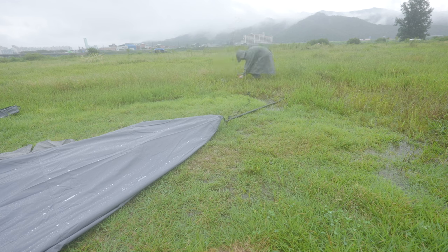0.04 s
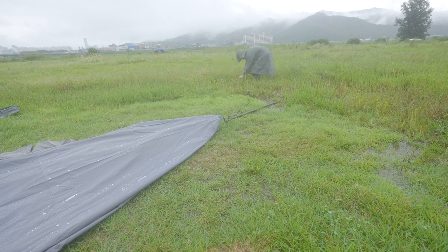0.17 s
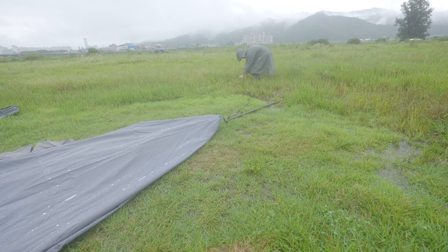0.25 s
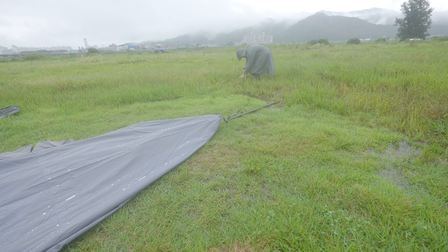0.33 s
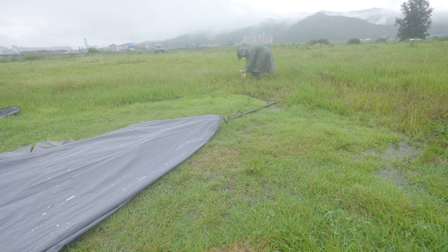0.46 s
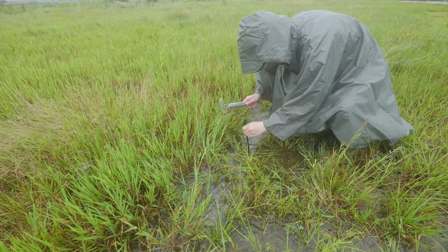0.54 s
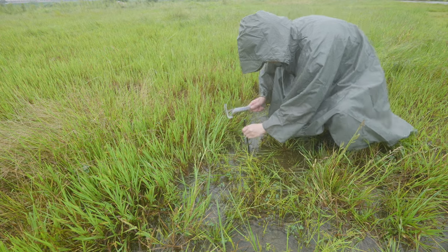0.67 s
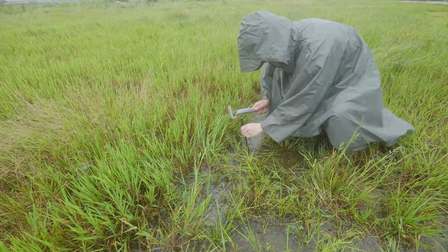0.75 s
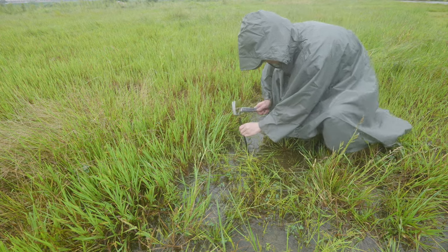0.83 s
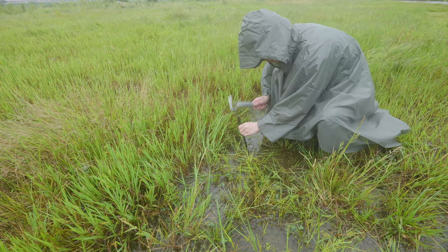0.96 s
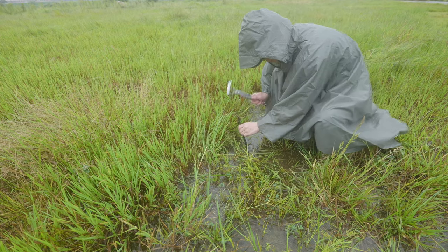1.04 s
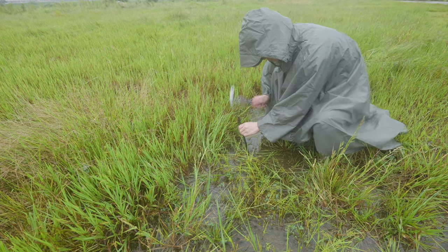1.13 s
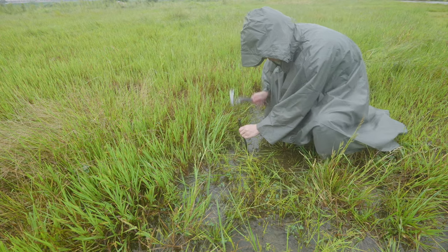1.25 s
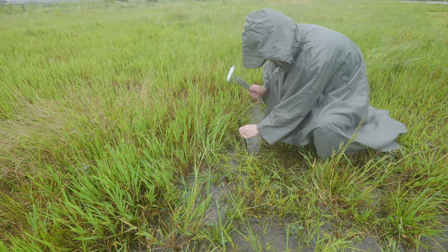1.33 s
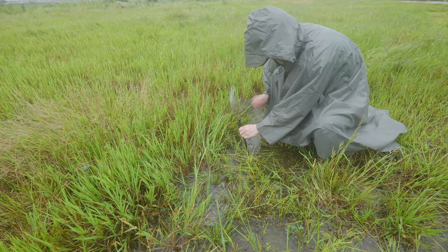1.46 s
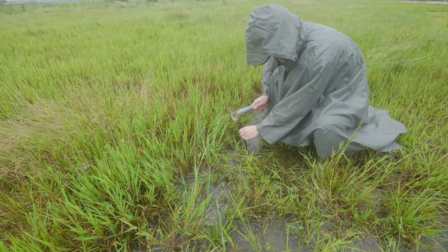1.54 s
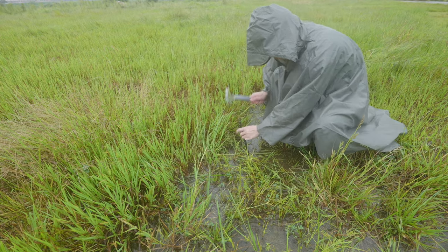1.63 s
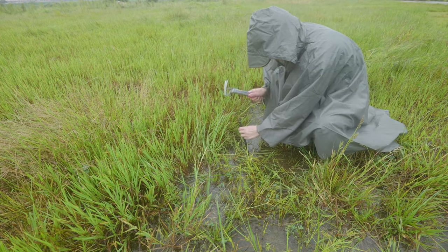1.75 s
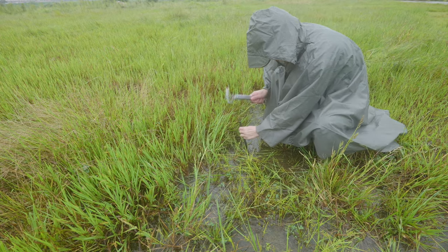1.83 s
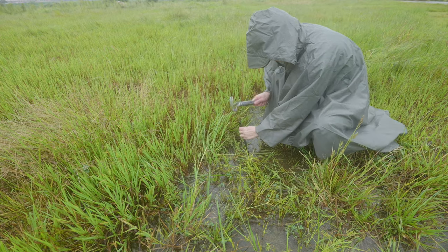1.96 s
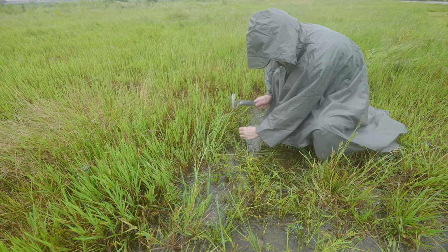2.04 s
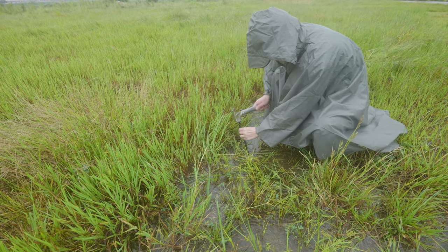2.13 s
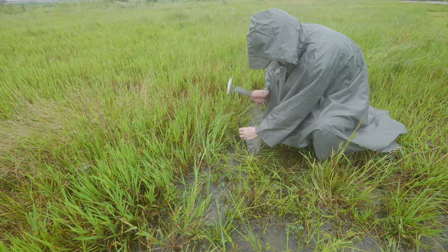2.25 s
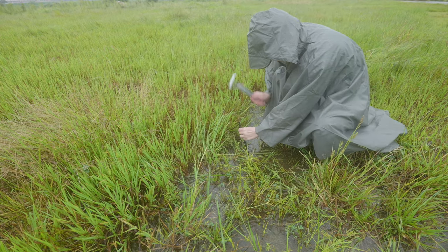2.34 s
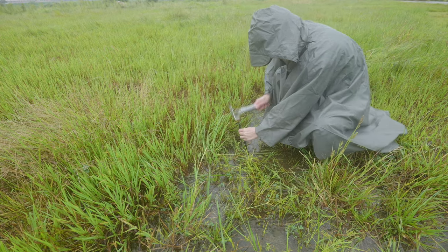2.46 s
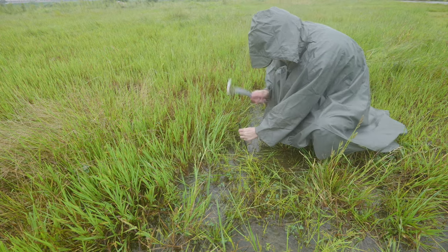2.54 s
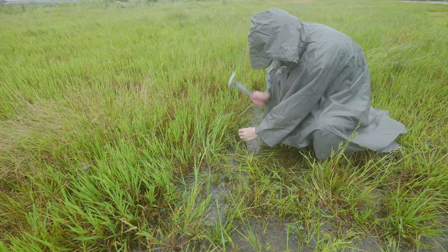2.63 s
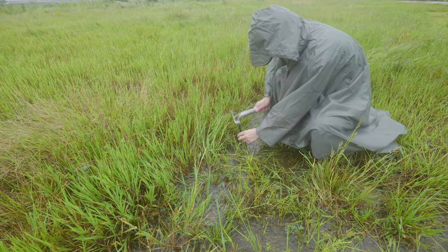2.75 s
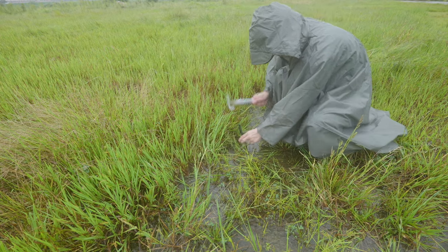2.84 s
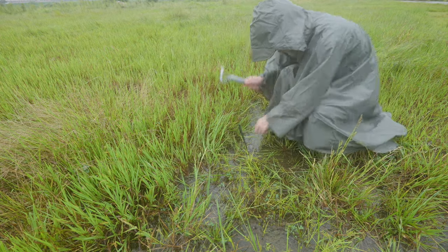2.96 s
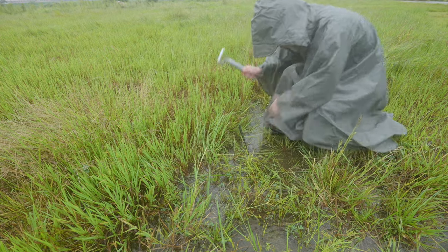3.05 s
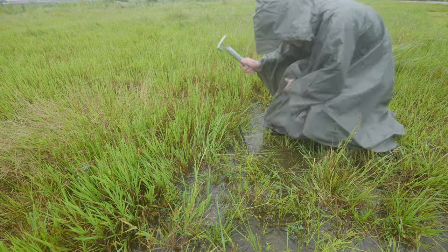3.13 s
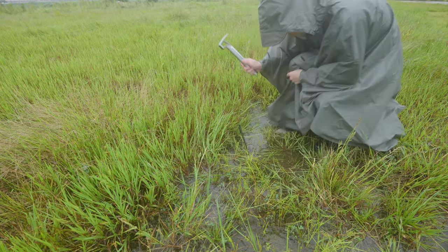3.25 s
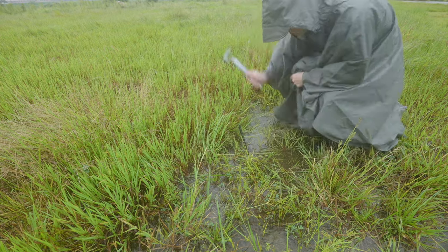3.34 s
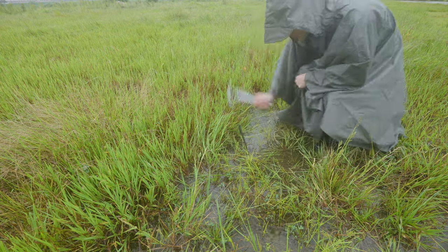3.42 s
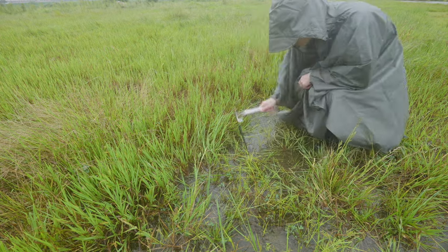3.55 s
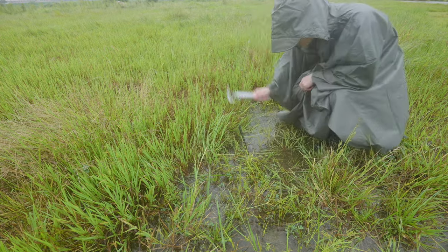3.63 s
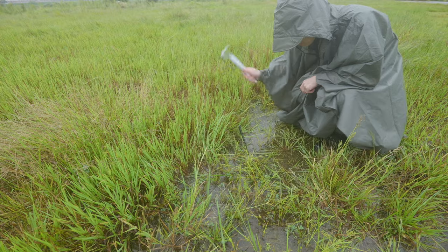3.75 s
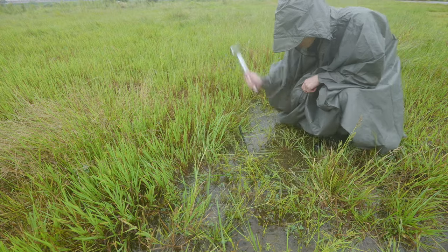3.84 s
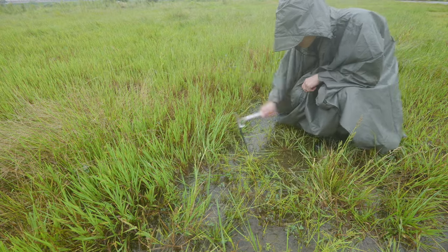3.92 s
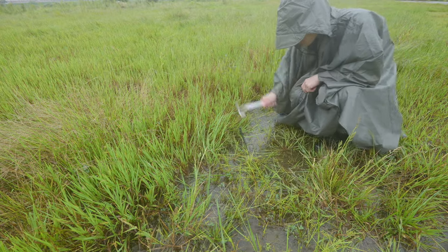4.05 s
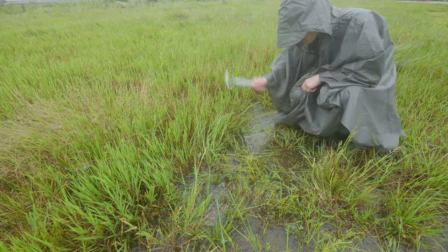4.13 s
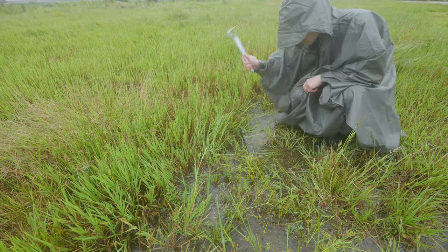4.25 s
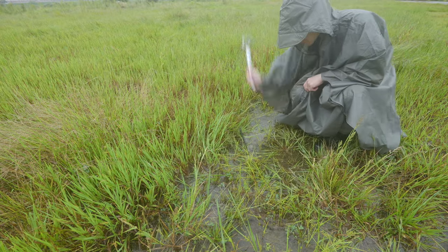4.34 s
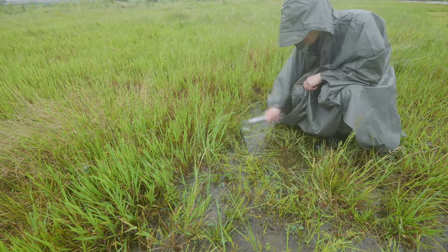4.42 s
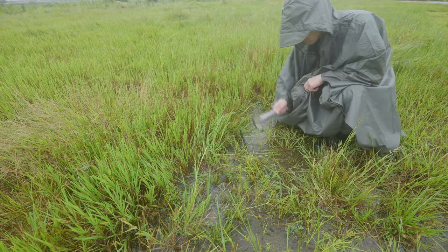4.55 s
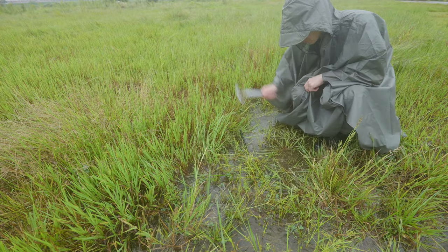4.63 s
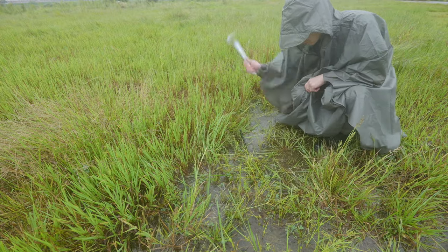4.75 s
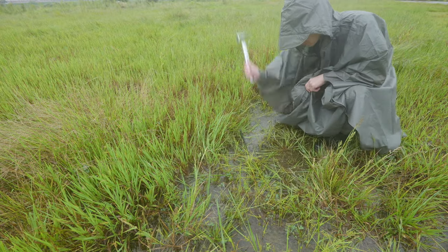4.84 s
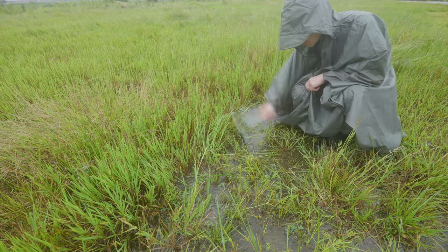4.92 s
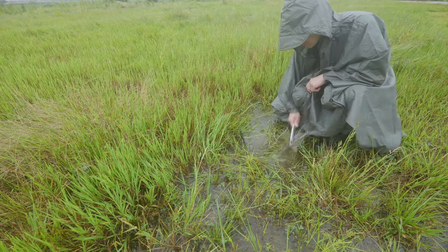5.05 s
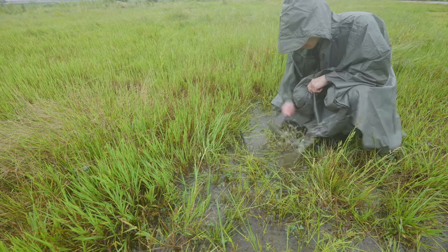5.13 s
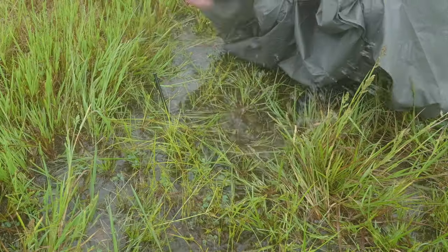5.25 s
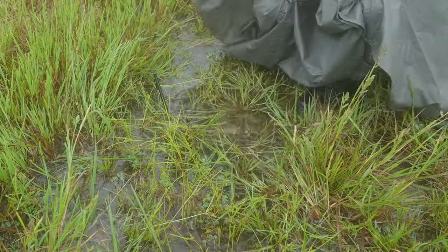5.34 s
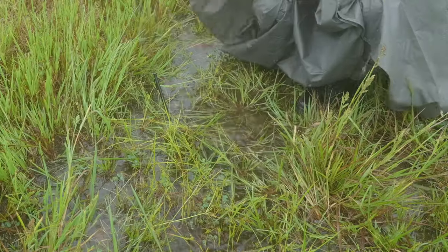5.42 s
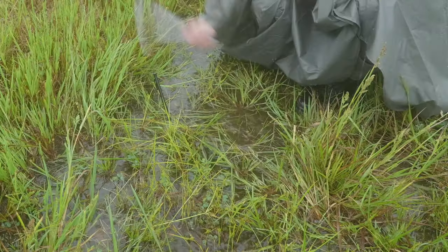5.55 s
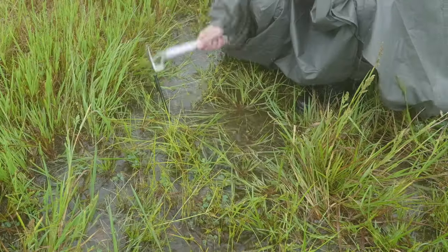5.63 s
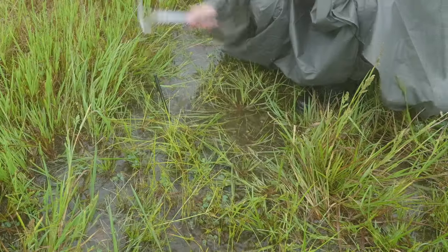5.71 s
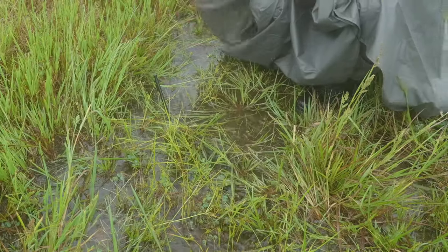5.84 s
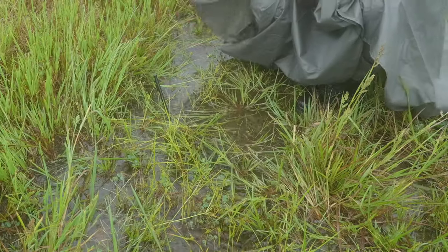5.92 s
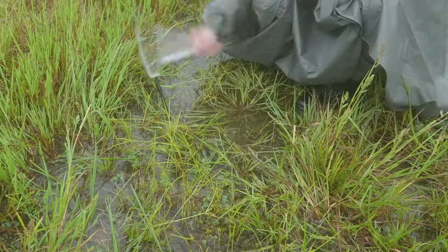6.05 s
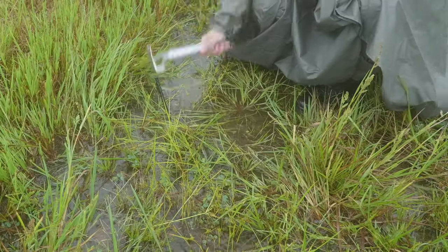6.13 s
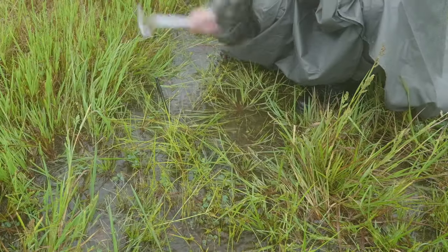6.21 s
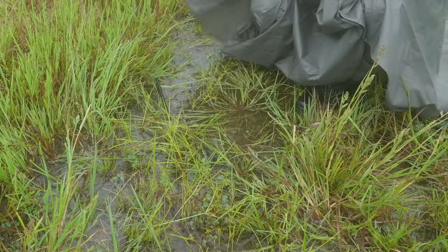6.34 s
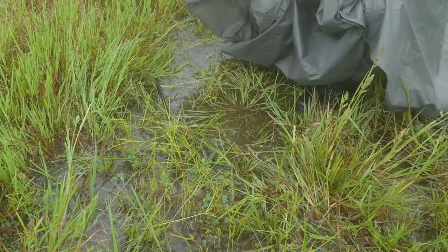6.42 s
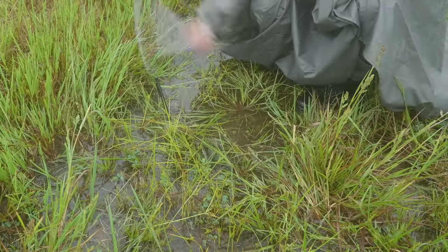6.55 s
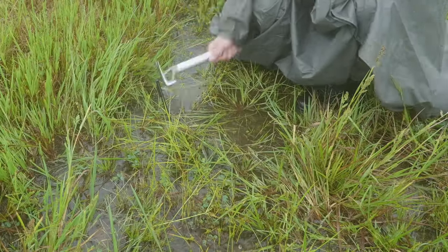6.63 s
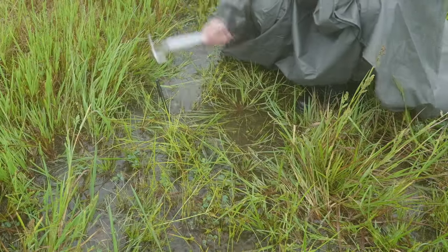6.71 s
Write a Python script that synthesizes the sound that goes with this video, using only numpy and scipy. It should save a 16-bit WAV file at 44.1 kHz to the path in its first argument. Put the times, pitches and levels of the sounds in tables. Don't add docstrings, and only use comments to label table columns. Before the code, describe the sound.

A steel hammer drives a peg into waterlogged turf with sharp, bright ringing cracks, over soft rain and fat drops ticking on a cloth cover.

```python
import sys
import numpy as np
from scipy import signal
from scipy.fft import rfft, irfft
from scipy.io import wavfile
from scipy.ndimage import uniform_filter1d

SR = 44100
rng = np.random.default_rng(int(sys.argv[2]) if len(sys.argv) > 2 else 0)


def makeup_ratio(level_db):
    decades = np.asarray(level_db, float) / 20
    return 10 ** decades


def master_out(mix):
    frames = np.transpose(np.atleast_2d(mix))
    ceiling = np.clip(frames, -1, 1)
    pcm = np.round(ceiling * 32767).astype(np.int16)
    wavfile.write(sys.argv[1], SR, pcm)


N = 298998

# [t/s, gust level/dB, rain level/dB]
WEATHER = [(0, -52, -39), (.3, -37, -37.5), (.49, -40, -38), (.68, -49.5, -46), (1.101, -38.5, -45.5),
           (1.3, -48, -50), (1.701, -54, -53.5), (2.06, -52, -52), (2.38, -48, -45.5), (2.81, -50, -55.5),
           (3.079, -52.5, -52), (3.25, -45, -49.5), (3.499, -49, -52.5), (3.901, -52.5, -53.5),
           (4.7, -57.5, -53.5), (5.5, -49.5, -54.5), (6.101, -51, -54.5), (6.78, -50.5, -54.5)]
# [f/Hz, density/dB per Hz]
WIND_SPECTRUM = [(25, 7), (55, 3.5), (110, 1.5), (250, -2.5), (500, -40.5)]
# [f/Hz, density/dB per Hz]
PATTER_SPECTRUM = [(100, -4.5), (250, -1.5), (600, 2), (1200, 2), (2500, -9), (5000, -57)]
# [f/Hz, density/dB per Hz]
HISS_SPECTRUM = [(800, -3.5), (2000, 4), (4000, 0.5), (7000, -4.5), (8200, -5.5), (12000, -7), (15600, -13),
                 (16200, -32)]
# [f/Hz, density/dB per Hz]
RUMBLE_SPECTRUM = [(30, -22), (52, 0), (70, -6), (120, -24), (300, -90)]
# [t/s, level/dB, length/s]
SHIFTS = [
    (.75, 4.7, 0.49),
    (3.3, 10.5, 0.2),
    (5.25, 3.5, 0.24),
]
# [t/s, level/dB, brightest f/Hz]
SPRAY = [(0.0054, -32, 5000), (0.0324, -37, 6000), (0.0563, -44, 5560), (0.2464, -48, 5770),
         (0.2724, -42, 5000), (0.2848, -41, 10200), (0.3067, -40, 5000), (0.3262, -37, 5710),
         (0.3656, -43, 5520), (0.3774, -44, 5200), (0.396, -34, 13000), (0.4329, -32, 7820),
         (0.4454, -37, 5460), (0.4522, -26, 7800), (0.4938, -48, 5350), (0.7048, -30.5, 5600),
         (0.8805, -31, 13200), (0.9218, -36, 5120), (1.1454, -42.5, 5530), (1.479, -30.5, 7710),
         (0.9513, -34, 4500), (2.167, -44, 5000), (2.255, -39, 6000), (2.365, -30, 5240),
         (2.385, -43, 5500), (2.533, -45, 4000), (1.315, -40, 6000), (1.367, -39, 7500), (1.377, -39, 5500),
         (1.395, -46, 6500), (3.39, -45, 5000), (3.415, -43, 9500), (3.52, -52, 13000), (3.597, -41, 6000),
         (4.48, -40.5, 6500), (4.727, -45, 8560), (5.179, -41, 6500), (3.249, -38, 5310),
         (4.4205, -43, 11000), (4.9092, -48, 5680), (5.3014, -45.5, 6290), (5.3194, -42, 6110),
         (5.3345, -35, 5700), (5.3494, -44, 5250), (5.3727, -45, 5080), (5.3961, -50, 6390),
         (5.4201, -45, 10400), (5.4494, -59, 5460), (5.5067, -34, 10200), (6.0492, -44, 6060),
         (6.5052, -45.5, 5280)]

# [t/s, thud level/dB, off centre/-1..1, tilt/-1..1, glance/-1..1]
BLOWS = [(0.101, -11.5, 0.54, -0.34, 0.57), (1.232, -21.5, -0.45, 0.3, 0.33),
         (1.556, -36, -0.58, 0.0071, -1.05), (2.179, -15.5, 0.27, 1, 0.38), (2.4727, -9, 1, -0.7, -0.12),
         (2.767, -12, 0.27, 0.24, 0.22), (3.5387, -14.5, -0.81, 0.52, 0.72),
         (3.9949, -10, -0.31, -0.13, 0.34), (4.4898, -11.5, 0.67, -0.005, -1.24),
         (5.0087, -10, -0.65, 0.48, -1.58), (5.653, -11, 1, -0.28, -0.84),
         (6.138, -12, -0.45, -0.94, 0.067), (6.6484, -11.5, -1.1, -0.47, 0.32)]
# [f/Hz, t60/s]
PEG = [(2190, .04), (2670, .018), (3607, .022), (6120, .018)]
# [f/Hz, t60/s]
HEAD = [(7025, .062), (8085, .034), (10735, .058), (13170, .03)]
# [f/Hz, t60/s]
CLAW = [(1150, .012), (4300, .02), (4850, .016), (9650, .033)]
# [square level/dB, off centre/dB, tilt/dB, glance/dB]
STIR = [(-18, 5.5, 1.5, -3.5), (-16.5, -4, -2, -7), (-16, -2, 10.5, -3.5), (-7, 0.4, -0.5, 2),
        (-21, -10.5, 4, 2), (-12, 4.5, 6.5, -1), (-15.5, -7, -6, -4), (-7.5, -1, -1, 1),
        (-26.5, -3.5, -4.5, -6), (-28.5, -1, 4, 3.5), (-28, -10, 4, 0), (-23.5, 8, 0.7, 7.5)]
# [f/Hz, level/dB, t60/s]
MINOR = [(3100, -23.5, 0.029), (7780, -19, 0.051), (7600, -45, 0.05), (11400, -16, 0.03), (13260, -9, 0.01),
         (14400, -29, 0.034), (10900, -25, 0.047)]
# [f/Hz, density/dB per Hz]
CRACK_SPECTRUM = [(180, -59.5), (300, -11.5), (5160, -2.5), (8390, 5.5), (9270, -6), (12100, -3),
                  (15800, -17), (16600, -28.5)]
# [f/Hz, density/dB per Hz]
EDGE_SPECTRUM = [(12000, -41), (14000, 2.5), (15500, -2), (16400, -11.5), (17000, -39.5)]
# [crack level/dB, edge level/dB, scatter level/dB, peg ring/share, head ring/share]
CONTACT = [(-10, -5.5, -28, 1, 1.35), (-5, 2.5, -28, 0.91, 1.2), (-6, -12, -34, 0.89, 0.84),
           (-11, -4, -30, 1.1, 0.52), (-4.5, 2, -31.5, 0.76, .9), (-6.5, 6.5, -28.5, 1.1, 0.69),
           (-8.5, 1, -33, 0.76, 0.74), (-3.5, 0.5, -31, 0.71, 0.42), (-2, 8.5, -28, 0.93, 0.93),
           (-6, 1, -27, 0.65, 0.45), (-7, 0.5, -30, 1.24, 0.57), (-5.5, 1.5, -19, 0.95, 0.97),
           (-6, 9, -23, 0.81, 0.51)]
# [low, middle, high peg mode/dB, lowest head mode/dB]
FREEDOM = [(-3.5, 5, -13, 4), (0, 2, 1, -0.5), (-1.5, 5, 5.5, -2.5), (0.2, 0.5, -1.5, 3.5),
           (1, -0.5, 5.5, -2), (2, 4.5, 3, 2.5), (6.5, -7, 6.5, 1), (0.5, 1.5, 0.5, -1), (-2, 3.5, 4.5, 13),
           (-0.5, 0.5, 1, 0.5), (2.5, -5.5, -1, 1), (-14, -2.5, -6.5, 4.5), (3, -1, -3.5, 1.2)]
# [second peg mode/dB, three upper head modes/dB, third claw mode/dB]
GRIP = [(3, -6, 2, -8, 6), (2, 2, 0.5, 1, 1.5), (-0.5, -2, -1, -8.5, -2.5), (1.5, -2, -3, -2, 1),
        (2, -0.5, 0.5, -2.5, 2), (1, -1.5, 6, -2, 1.5), (0.5, -2.5, -2, -3, -4), (0, -8, 4.5, 4.5, 1),
        (3.5, -3.5, -5.5, -1, -8), (1.5, -19, -0.5, -3, -1), (-6, -1, -0.5, -5.5, -7),
        (2.5, -6, -2, -2, 3.5), (1.5, 2, -1, 1.5, 8)]
# [level/dB, t60/s]
HOLLOW = [(-4.5, .01), (8.5, 0.0097), (6, 0.0081), (0.2, .012), (-3, 0.012), (-2, 0.0085), (-1.5, 0.0066),
          (0.5, 0.0064), (9.5, 0.012), (-11, 0.0077), (7.5, 0.015), (-6, 0.012), (0, 0.019)]
SINGING = [1.2, 1.5, .75, 0.45, .7, 1.1, 1.1, 1.05, 0.72, 1.1, 1.1, 1.03, 0.95]
# [level/dB, t60/s, beat f/Hz, twin share/0..1, first hush/s]
WHISTLES = [(-29.5, 0.245, 14, .85, 0.071), (-24.5, 0.4, 9.1, 0.4, 0.0022), (-23, 0.31, 13.1, .55, 0.035),
            (-30.5, .27, 41.5, .16, 0.019), (-18.5, .24, 23.8, .18, .001), (-37, 0.64, 17.8, 0.36, .008),
            (-30, .29, 17.7, .26, 0.015), (-28.5, 0.46, 10.8, .41, 0.0033), (-23, .27, 39, .6, 0.033),
            (-27, .3, 110, 0.9, 0.0017), (-28, 0.22, 31, 0.6, .009), (-16, 0.26, 12.6, 0.6, 0.022),
            (-19.5, 0.25, 21, 0.4, .037)]
# [t/s, level/dB, most stirred f/Hz, t60/s]
CHATTER = [(0.1104, -4.5, 3850, 0.017), (1.244, -10.5, 6200, 0.012), (1.2484, -17, 8000, .02),
           (1.565, -6, 6300, 0.017), (2.183, -6, 3570, 0.021), (2.475, -16.5, 6160, 0.018),
           (2.772, -17.5, 3100, 0.017), (3.541, -7, 5640, 0.011), (4.496, -16.5, 3570, 0.017),
           (5.0118, -19.5, 3950, 0.029), (5.672, -23, 3540, 0.023), (6.142, -22, 6510, 0.017),
           (6.6535, -16.5, 4860, 0.007)]

# [t/s, level/dB, f/Hz, t60/s]
BUBBLES = [(.776, -37, 2500, .03), (5.224, -52, 5250, .04), (5.233, -48, 5400, .05),
           (5.45, -34, 700, 0.023), (4.497, -37, 350, 0.18), (5.66, -37, 350, 0.17), (6.166, -37, 520, .03),
           (.111, -29, 3900, .05), (.113, -32, 4350, .05), (5.088, -30, 520, .04), (5.088, -38, 2100, .03)]
# [t/s, level/dB, t60/s]
SQUIRTS = [(5.056, -41, 0.045), (5.0745, -41, .02), (4.997, -42, .014), (5.086, -38, 0.16),
           (5.126, -41, 0.12), (5.145, -44, .15), (3.444, -41, .08), (.112, -34, .08), (4.447, -50, .08),
           (3.435, -42, .07), (1.476, -38, 0.02), (4.479, -45, .015)]
# [f/Hz, density/dB per Hz]
SQUIRT_SPECTRUM = [(200, -16), (600, 4.5), (2300, -5), (6000, -9), (10000, -16), (16000, -30.5)]
# [t/s, tick level/dB, thump level/dB, thump f/Hz, splash over tick/dB]
THUMPS = [(0.257, -18, -27, 144, -26), (0.4, -37, -24, 660, -23), (0.41, -18, -42, 467, -23),
          (0.4324, -8, -13.5, 260, -26), (0.451, -1.5, -3, 427, -25), (0.639, -32, -29.5, 259, -19),
          (0.657, -25.5, -35, 190, -12), (0.986, -20.5, -30, 146, -10), (1.197, -14.5, -30, 465, -15.5),
          (1.341, -15.5, -13.5, 263.5, -17.5), (1.69, -24.5, -35, 287, -28), (1.977, -28.5, -28, 176, -27),
          (2.364, -13.5, -25, 268, -24), (2.65, -19, -29.5, 152, -27), (2.703, -19.5, -18, 232, -23.5),
          (2.991, -17, -22.5, 280, -25), (3.184, -29.5, -35, 149.7, -30), (3.913, -23.5, -20, 338, -17.5),
          (4.3606, -31, -19, 560, -19.5), (4.564, -23.5, -34, 238, -9), (4.755, -37, -35, 153, -19),
          (4.797, -31, -28.5, 177, -23), (4.963, -34, -29, 186, -23), (5.087, -22, -24, 510, -12),
          (5.373, -33.5, -39, 198, -21), (5.612, -24.5, -26.5, 359, -35), (6.127, -17, -15.5, 172, -15.5)]
# [t/s, tick level/dB, tick
# f/Hz, splash over tick/dB]
TICKS = [(0.175, -17, 885, -23), (0.274, -17, 990, -24), (0.489, -15, 1070, -34), (0.705, -30, 1150, -8.5),
         (0.717, -27.5, 900, -24), (0.808, -36, 800, -30), (0.845, -26.5, 1400, -18),
         (0.921, -24.5, 1410, -18), (1.108, -21, 960, -20), (1.504, -38.5, 1580, -5),
         (2.018, -40, 1850, -7), (2.91, -24.5, 1425, -25.5), (3.06, -24.5, 753, -21),
         (3.117, -34, 1860, -10), (3.725, -37.5, 830, -7), (3.958, -23.5, 1040, -15),
         (4.278, -35, 1570, -4.5), (4.304, -39, 1080, -4), (4.729, -42, 890, -6), (5.178, -40.5, 1640, -7),
         (1.323, -35, 1500, -8), (3.597, -31, 1500, -21), (.141, -17, 1100, -23), (.562, -33, 1500, -8),
         (5.409, -32, 1160, -14), (5.785, -35, 1000, -26), (5.912, -25, 1320, -36),
         (6.585, -35, 860, -10.5), (0.4512, 3.5, 2800, -20), (4.3597, -3, 720, -20),
         (4.3612, -7, 3200, -18), (4.3597, -10, 3700, -21), (0.4326, -5, 2460, -29)]
# [f/Hz, density/dB per Hz]
SPLASH_SPECTRUM = [(1200, -0.5), (3000, 5), (5500, -8), (9000, -30.5), (16000, -32.5)]
# [t/s, level/dB, f/Hz]
FLAPS = [(0.153, -24, 104), (0.245, -16, 135), (0.432, -18, 69), (0.997, -22.5, 94), (1.34, -17.5, 93),
         (1.978, -31, 103.7), (2.326, -36, 85.5), (2.657, -27, 145), (2.98, -32, 88.3), (3.496, -27.5, 101),
         (4.484, -27, 132), (4.749, -46, 154), (4.95, -26, 119.5), (5.122, -31, 108), (5.369, -33, 92),
         (5.614, -25.5, 76), (5.65, -13.5, 211), (6.116, -24, 162), (6.138, -23, 169), (4.211, -36, 170),
         (4.245, -30, 150), (6.636, -23, 139)]
# [t/s, level/dB]
TAP = [
    (0.9905, -14.5),
]
# [f/Hz, level/dB, t60/s]
TAP_MODES = [(2500, -14, 0.012), (3640, -9, 0.019), (5020, -5, 0.011), (6130, -7, 0.014), (8200, -16, 0.03),
             (9720, -8, 0.045), (11500, -14, 0.025), (12500, -28, 0.06), (14300, -14, 0.02)]
# [f/Hz, level re line/dB]
GAP_FLOOR = [(8500, -67.5), (10000, -49), (12000, -43), (14500, -45), (16000, -49.5)]

HUM_HZ, HUM_WIDTH_HZ, HUM_DB, RUMBLE_DB = 198, 8.9, -60, -61
HISS_DB, HISS_PER_RAIN = -61, 0.48
SWING_DB, SWING_S, SETTLE_S = 3.5, 0.09, 0.2
WEATHER_EDGE_HZ = 15900
CRACK_DB = -1.3
MODE_WOBBLE = .004
WHISTLE_HZ, TWIN_FADE_DB_PER_S = 11418, 50.
SAG_DB_PER_S2 = 301
SLACK_TICK_HZ, SLACK_SPLASH_DB = 1150, -0.4
TAUT_THUMP_DB, TAUT_THUMP_HZ = -21.5, 296


def evened(x):
    return x / np.sqrt(np.mean(x ** 2) + 1e-20)


def read(points, f_hz):
    f, value = np.transpose(points)
    return np.interp(np.log(f_hz + 1), np.log(f), value)


def add(mix, t_s, sound):
    part = mix[round(t_s * SR):][:len(sound)]
    part += sound[:len(part)]


def decay(db, t60_s, size):
    return makeup_ratio(db - 60 * np.arange(size) / SR / t60_s)


def mode(f_hz, db, t60_s, turns=0., rise_s=0.0003):
    size = round(min(t60_s, .3) * 1.2 * SR) + 9
    t = np.arange(size) / SR
    return decay(db, t60_s, size) * np.sin(2 * np.pi * (f_hz * t + turns)) * (1 - np.exp(-t / rise_s))


def coloured(x, points):
    gain = makeup_ratio(read(points, np.fft.rfftfreq(len(x), 1 / SR)))
    return evened(irfft(rfft(x) * gain, len(x)))


def patchy(points, patch_db, gust_db, size):
    frames = 4 * N // size + 5
    a, b, patches = rng.standard_normal((frames, size // 2 + 1, 3)).T
    patches = uniform_filter1d(patches, size=size // 100, axis=0)
    patches = evened(uniform_filter1d(patches, size=6, axis=1))
    gusts = evened(uniform_filter1d(rng.standard_normal(frames), size=4))
    db = read(points, np.fft.rfftfreq(size, 1 / SR))[:, None] + patch_db * patches + gust_db * gusts
    noise = signal.istft((a + 1j * b) * makeup_ratio(db), nperseg=size, noverlap=size - size // 4)[1]
    return evened(noise[:N])


def droplets(per_s, spread_db, low_hz, high_hz, cycles):
    sizes = makeup_ratio(spread_db * np.minimum(rng.exponential(1, N), 5))
    sizes = sizes * (rng.random(N) < per_s / SR)
    kind = rng.integers(0, 16, N)
    out = np.zeros(N)
    for k, f_hz in enumerate(np.geomspace(low_hz, high_hz, num=16)):
        drop = mode(f_hz, 0, cycles / f_hz, rise_s=0.45 / f_hz)
        out += signal.oaconvolve(sizes * (kind == k), drop)[:N]
    return evened(out)


def far_hum(rain_db):
    r = np.exp(-np.pi * HUM_WIDTH_HZ / SR)
    poles = [1, -2 * r * np.cos(2 * np.pi * HUM_HZ / SR), r * r]
    hum = evened(signal.lfilter([1], poles, rng.standard_normal(N)))
    rumble = coloured(rng.standard_normal(N), RUMBLE_SPECTRUM)
    return makeup_ratio(HUM_DB + .4 * (rain_db + 53.0)) * hum + makeup_ratio(RUMBLE_DB) * rumble


def weather():
    t_s, gust, rain = np.transpose(WEATHER)
    t = np.arange(N) / SR
    wind_db, rain_db = np.interp(t, t_s, gust), np.interp(t, t_s, rain)
    swing = sum(np.interp(t - row[0], [-SWING_S, 0, SETTLE_S], [0, 1, 0]) for row in BLOWS)
    hiss_db = HISS_DB + HISS_PER_RAIN * (rain_db + 53.0) + SWING_DB * swing
    for at_s, db, length_s in SHIFTS:
        hiss_db += db * np.exp(-((t - at_s) / length_s) ** 2)
    wind = patchy(WIND_SPECTRUM, patch_db=3.5, gust_db=4.0, size=1024)
    patter = patchy(PATTER_SPECTRUM, patch_db=1.5, gust_db=2.5, size=512)
    patter += 0.72 * droplets(600.0, 4.2, 300.0, 3300.0, 6.)
    hiss = patchy(HISS_SPECTRUM, patch_db=0.7, gust_db=2.5, size=256)
    hiss += .6 * droplets(900, 4., 2000, 12500, 2.5)
    near = makeup_ratio(wind_db - 2.0) * wind + makeup_ratio(rain_db - 2.5) * patter + makeup_ratio(hiss_db - 3.) * hiss
    return signal.oaconvolve(near + far_hum(rain_db), signal.firwin(255, WEATHER_EDGE_HZ, fs=SR), "same")


def spray():
    out = np.zeros(N)
    for (t_s, db, f_hz), puff in zip(SPRAY, rng.standard_normal((len(SPRAY), 512))):
        band = [(1500, -30), (0.85 * f_hz, -9), (f_hz, 0), (1.2 * f_hz, -12), (3.5 * f_hz, -22)]
        add(out, t_s, decay(db - 6.5, 0.0061, 512) * coloured(puff, band))
    return out


def crack(noise, t60_s=0.016, scatter_db=-29):
    size = len(noise)
    fade = decay(0, t60_s, size) + decay(scatter_db, 0.056, size)
    rise = 1 - np.exp(-np.arange(size) / SR / 0.000092)
    return coloured(noise, CRACK_SPECTRUM) * fade * rise


def blow_ring(noise, chance, landing, contact, free, grip, knock, song):
    crack_db, edge_db, scatter_db, peg_share, head_share = contact
    ring = makeup_ratio(crack_db) * crack(noise, scatter_db=scatter_db)
    add(ring, 0, decay(edge_db - 26.0, .03, 4096) * coloured(noise[::-1], EDGE_SPECTRUM))
    trims_db = [free[0], grip[0], *free[1:], *grip[1:4], knock[0], 0, grip[4], 0]
    shares = [peg_share] * len(PEG)
    shares += [song, peg_share, head_share, peg_share]
    shares += [knock[1] / CLAW[0][1], 1, 1, peg_share]
    for (f_hz, t60_s), (db, *per), turns, trim_db, share in zip(PEG + HEAD + CLAW, STIR, chance, trims_db, shares):
        shifted_hz = f_hz * (1 + MODE_WOBBLE * (turns - .5))
        add(ring, 0, mode(shifted_hz, db + trim_db + np.dot(per, landing), t60_s * share, turns))
    for (f_hz, db, t60_s), turns, loss, shift in zip(MINOR, chance[12:], chance[20:], chance[28:]):
        add(ring, 0, mode(f_hz * (1 + 0.065 * (shift - .5)), db - 5.9 * loss, t60_s, turns))
    return ring


def whistle(db, t60_s, beat_hz, share, hush_s):
    t = np.arange(0, .3, 1 / SR)
    after = t - hush_s
    f_hz = WHISTLE_HZ - beat_hz * share / 2
    hand_shake = beat_hz / 45 * np.sin(2 * np.pi * 13 * after)
    twin = np.sin(2 * np.pi * (f_hz + beat_hz) * after + hand_shake)
    twin *= min(share, 1) * makeup_ratio(-TWIN_FADE_DB_PER_S * np.maximum(after, 0))
    pair = np.sin(2 * np.pi * f_hz * after) - twin
    return makeup_ratio(db - 60 * t / t60_s - SAG_DB_PER_S2 * t ** 2) * pair


def chatter(out, blow_s, ring, noise):
    dull = 0.67 * ring + 0.43 * crack(noise[::-1], t60_s=0.024, scatter_db=-59.5)
    dull = signal.lfilter(*signal.butter(1, 6500., fs=SR), dull)
    for t_s, db, f_hz, t60_s in CHATTER:
        if 0 < t_s - blow_s < .05:
            add(out, t_s, makeup_ratio(CRACK_DB + db) * dull)
            band = [(.6 * f_hz, -40), (.82 * f_hz, -4), (f_hz, 0), (1.15 * f_hz, -4), (1.5 * f_hz, -40)]
            add(out, t_s, mode(f_hz, db - 11.5, t60_s))
            add(out, t_s, decay(db - 10.0, t60_s, 2048) * coloured(noise[:2048], band))


def hammer():
    out = np.zeros(N)
    noises, luck = rng.standard_normal((len(BLOWS), 4096)), rng.random((len(BLOWS), 40))
    per_blow = zip(BLOWS, WHISTLES, noises, luck, CONTACT, FREEDOM, GRIP, HOLLOW, SINGING)
    for (t_s, thud_db, *landing), tone, noise, chance, contact, free, grip, knock, song in per_blow:
        ring = blow_ring(noise, chance, landing, contact, free, grip, knock, song)
        add(out, t_s, makeup_ratio(CRACK_DB) * ring)
        add(out, t_s, mode(610, thud_db + 1.0, 0.005, rise_s=0.00021))
        add(out, t_s + 0.0022, whistle(*tone))
        chatter(out, t_s, ring, noise)
    return out


def bubbles():
    out = np.zeros(N)
    for t_s, db, f_hz, t60_s in BUBBLES:
        add(out, t_s, mode(f_hz, db, t60_s, rise_s=.002))
    return out


def squirts():
    out, t = np.zeros(N), np.arange(8192) / SR
    for (t_s, db, t60_s), noise in zip(SQUIRTS, rng.standard_normal((len(SQUIRTS), 8192))):
        swell = np.minimum(t / t60_s / 0.061, 1)
        add(out, t_s, coloured(noise, SQUIRT_SPECTRUM) * decay(db, t60_s, 8192) * swell)
    return out


def high_passed(x, order, cut_hz):
    return signal.lfilter(*signal.butter(order, cut_hz, "high", fs=SR), x)


def cover_drops():
    out, t = np.zeros(N), np.arange(512) / SR
    rows = [(t_s, db, SLACK_TICK_HZ, thump_db, f_hz, SLACK_SPLASH_DB + splash_db)
            for t_s, db, thump_db, f_hz, splash_db in THUMPS]
    rows += [(t_s, db, f_hz, db + TAUT_THUMP_DB, TAUT_THUMP_HZ, splash_db)
             for t_s, db, f_hz, splash_db in TICKS]
    puffs = rng.standard_normal((len(rows), 512))
    for (t_s, tick_db, tick_hz, thump_db, thump_hz, splash_db), puff in zip(rows, puffs):
        t_s = t_s + .001
        tick = mode(tick_hz, tick_db + 5.5, 3.37 / tick_hz, rise_s=0.00027)
        add(out, t_s, high_passed(tick, 1, .25 * tick_hz))
        thump = mode(thump_hz, thump_db + 4.5, 3.02 / thump_hz, rise_s=0.00016)
        add(out, t_s + 0.00056, -high_passed(thump, 2, .3 * thump_hz))
        splash = decay(tick_db + splash_db + 8., .006, 512) * coloured(puff, SPLASH_SPECTRUM)
        add(out, t_s, splash * (1 - np.exp(-t / .0003)))
    return out


def flaps():
    out = np.zeros(N)
    for t_s, db, f_hz in FLAPS:
        add(out, t_s + 0.0044, mode(f_hz, db + 1.5, 7.8 / f_hz, rise_s=0.011))
    return out


def tap():
    out = np.zeros(N)
    (t_s, tap_db), = TAP
    for f_hz, db, t60_s in TAP_MODES:
        add(out, t_s, mode(f_hz, tap_db + db - 3.5, t60_s))
    return out


def lingering_head():
    out = np.zeros(N)
    linger = mode(8040, -64., 1.1, rise_s=0.0091)
    t = np.arange(len(linger)) / SR
    waver = 1 + .6 * np.sin(2 * np.pi * t * 13.) * np.sin(2 * np.pi * t * 31.)
    add(out, 4.495, linger * waver)
    return out


def peg_springback():
    out = np.zeros(N)
    for f_hz, db, t60_s in [(2200, -32.5, 0.032), (2620, -31., 0.016), (3700, -38, 0.018)]:
        add(out, 6.1645, mode(f_hz, db, t60_s))
    return out


def scene():
    steel = hammer() + tap() + lingering_head() + peg_springback()
    water = spray() + bubbles() + squirts()
    cloth = cover_drops() + flaps()
    return (weather() + steel + water + cloth)[None]


def hiss_gaps(x):
    f_hz, _, z = signal.stft(x, SR, nperseg=1024, noverlap=768)
    power = abs(z) ** 2
    treble = power[:, f_hz > 9000]
    line = treble.max(axis=1, keepdims=True)
    floor = line * makeup_ratio(2 * read(GAP_FLOOR, f_hz))[:, None]
    keep = uniform_filter1d(power, size=12, axis=1) > floor
    keep |= np.median(treble, axis=1, keepdims=True) > line * makeup_ratio(-66)
    return signal.istft(z * np.where(keep, 1, .05), SR, nperseg=1024, noverlap=768)[1][:, :N]


def band_limit(x):
    return signal.sosfilt(signal.butter(12, 16530, fs=SR, output="sos"), x)


def record(dry):
    cut = signal.sosfilt(signal.butter(2, 42., "high", fs=SR, output="sos"), dry)
    power_db = 10 * np.log10(signal.lfilter([.002], [1, -.998], cut ** 2) + 1e-12)
    fall_db = np.arange(N) * 60. / SR
    held_db = np.maximum.accumulate(power_db + fall_db, axis=1) - fall_db
    over_db = np.maximum(held_db + 33.5, 0)
    ducked = cut / makeup_ratio(.3 * signal.lfilter([.001], [1, -.999], over_db))
    flattened = np.tanh(ducked * 1.234) / 0.79
    top_cut = signal.oaconvolve(flattened, signal.firwin(511, 16380., fs=SR)[None], "same")
    mix = hiss_gaps(top_cut)
    return band_limit(mix)


dry = scene()
out = record(dry)
master_out(out)
```